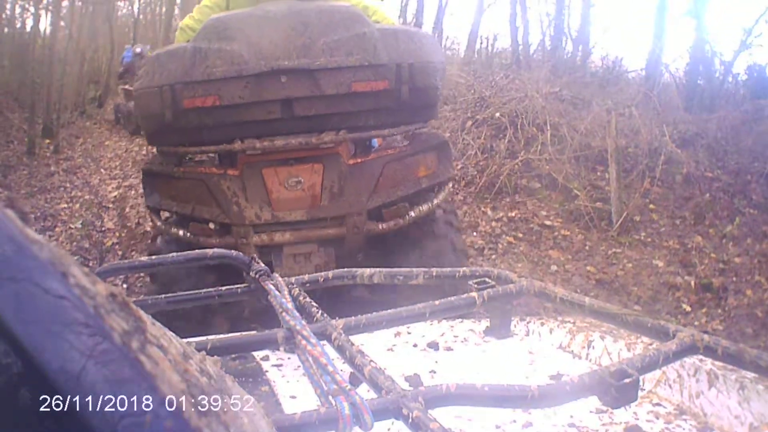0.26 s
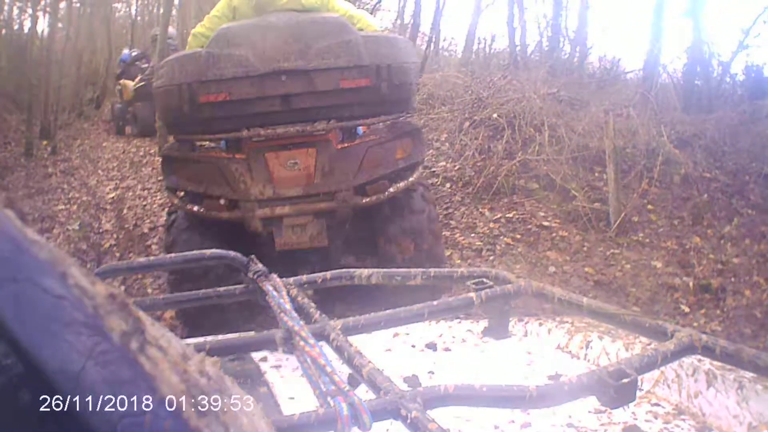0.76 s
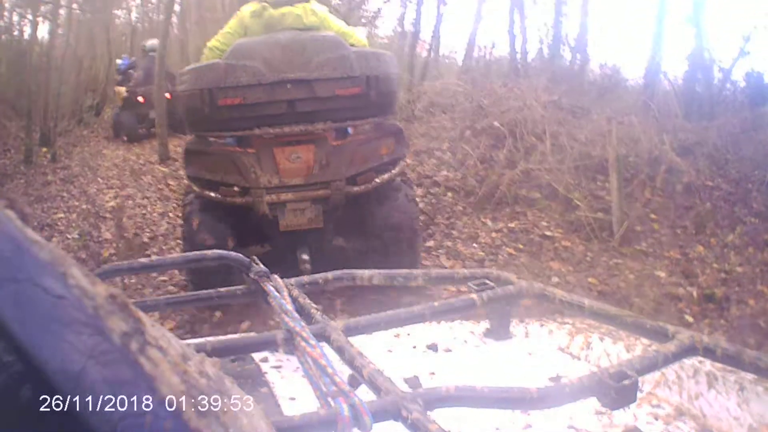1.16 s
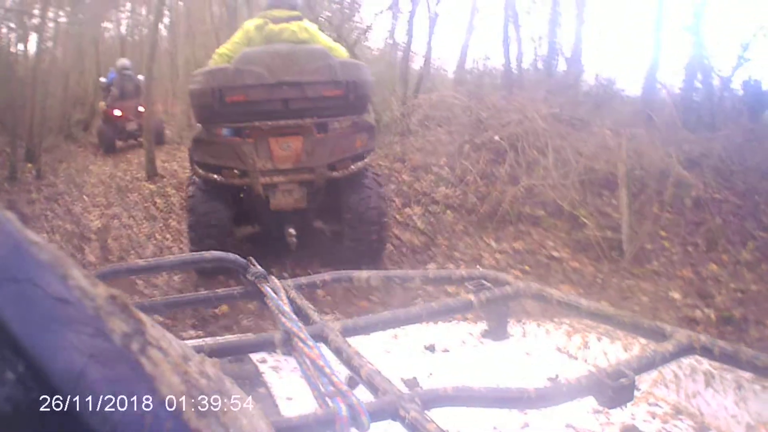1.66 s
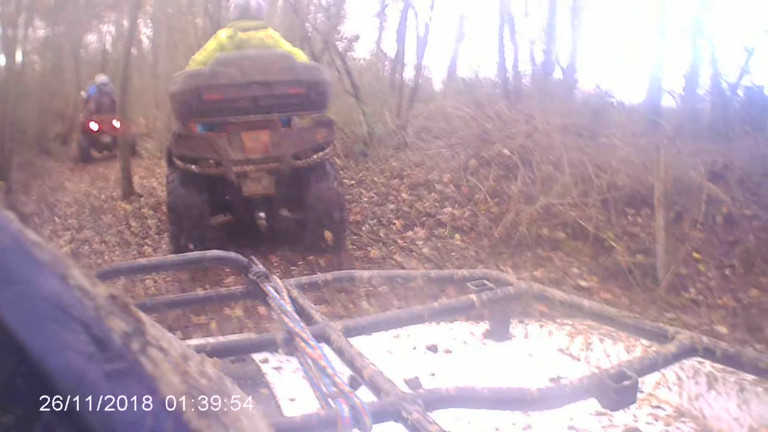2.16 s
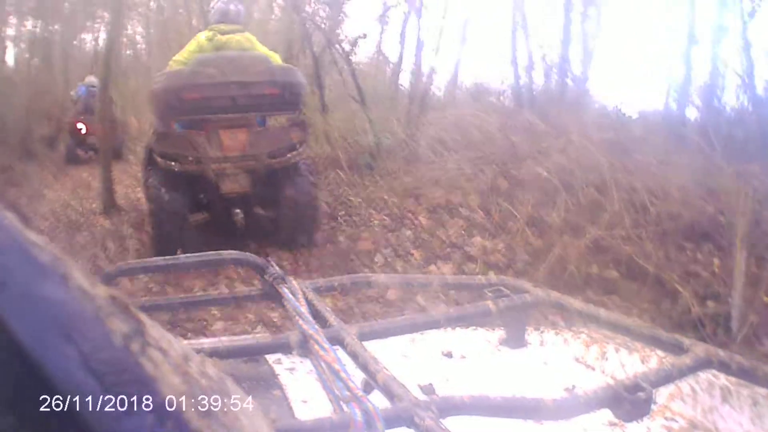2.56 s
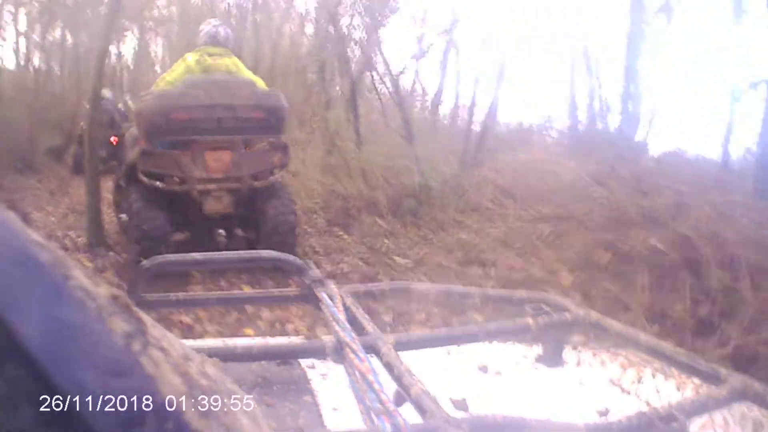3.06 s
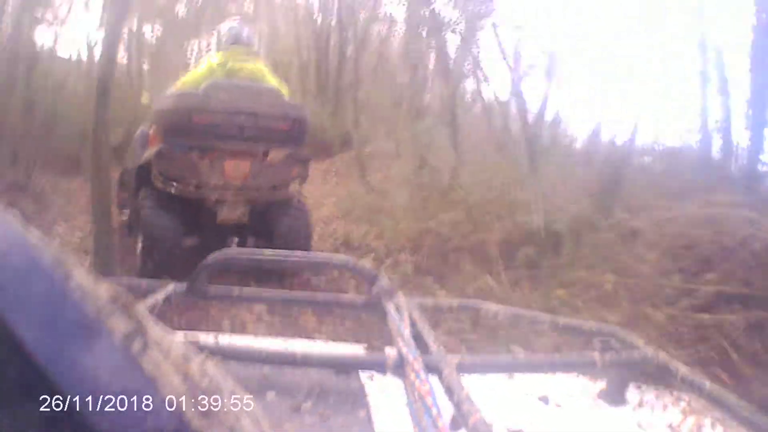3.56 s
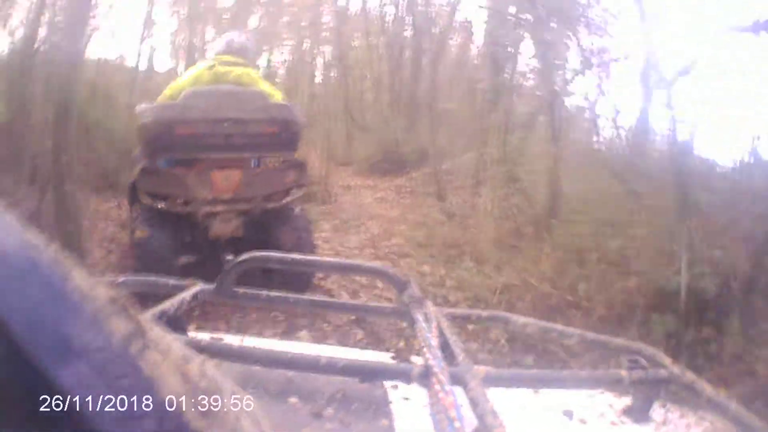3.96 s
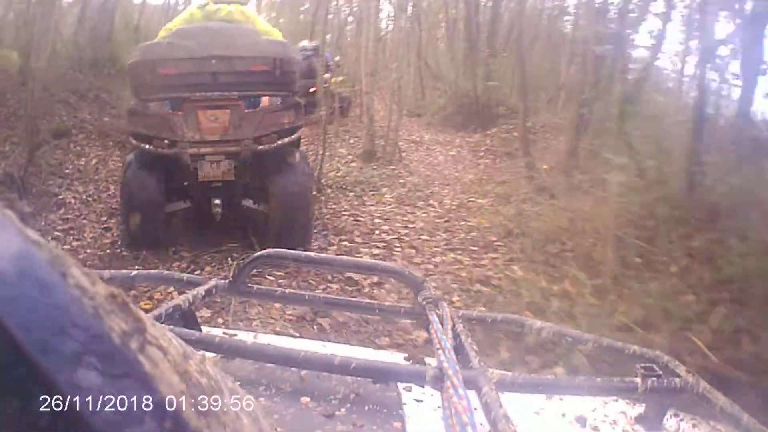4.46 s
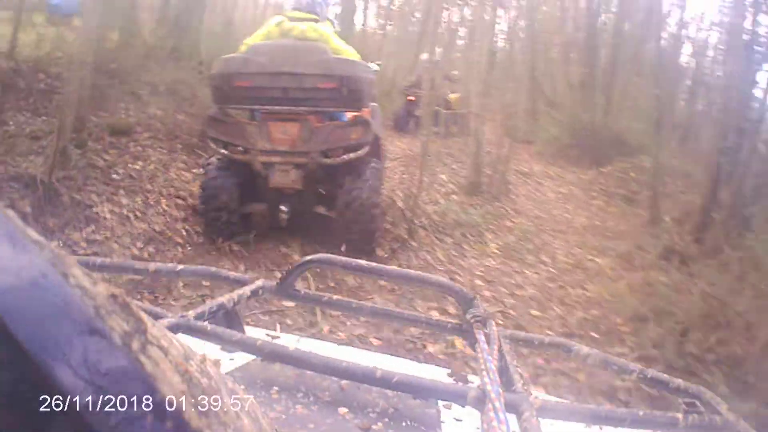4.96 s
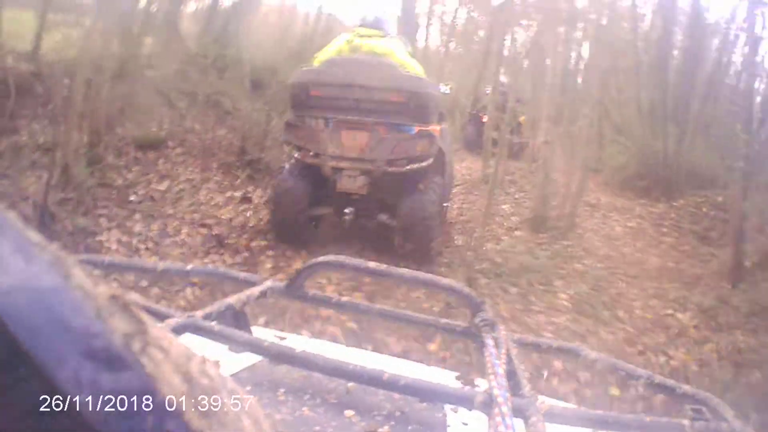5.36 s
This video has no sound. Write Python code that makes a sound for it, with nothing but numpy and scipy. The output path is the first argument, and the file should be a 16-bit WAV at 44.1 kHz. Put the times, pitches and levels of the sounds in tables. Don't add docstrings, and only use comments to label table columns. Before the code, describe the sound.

Low, overloaded engine vibration and rapid hollow plastic rattling come and go, with softer muffled droning and light taps between the bouts.

```python
import sys
import numpy as np
from scipy import signal
from scipy.fft import rfft, irfft, next_fast_len
from scipy.io import wavfile
from scipy.ndimage import uniform_filter1d, map_coordinates

SR = 44100
rng = np.random.default_rng(int(sys.argv[2]) if len(sys.argv) > 2 else 0)


def put_to_file(sound):
    columns = np.atleast_2d(sound).T
    safe = np.clip(columns, -1, 1)
    whole_steps = np.round(safe * 32767)
    wavfile.write(sys.argv[1], SR, whole_steps.astype(np.int16))


def decibels_to_gain(level_db):
    exponent = np.asarray(level_db, float) / 20
    return 10 ** exponent


N = 247401
TIME = np.arange(N) / SR


def unit(x):
    return x / np.sqrt(np.mean(x ** 2) + 1e-20)


def curve(rows):
    seconds, values = np.transpose(rows)
    return np.interp(TIME, seconds, values)


def wobble(rate):
    knots = rng.standard_normal(int(N * rate / SR) + 4)
    return map_coordinates(knots, [TIME * rate])


def filtered(x, response):
    size = next_fast_len(N + 8192)
    return irfft(rfft(x, size) * response(np.fft.rfftfreq(size, 1 / SR)), size)[:N]


def coloured(points):
    hz, db = np.transpose([(10, -120)] + list(points) + [(21000, -120)])
    noise = rng.standard_normal(N)
    return unit(filtered(noise, lambda f: decibels_to_gain(np.interp(np.log(f + 1), np.log(hz), db))))


def resonance(centre_hz, width_hz, skirt=3):
    def peak(f, width):
        return 1j * f * width / (centre_hz ** 2 - f * f + 1j * f * width)
    return lambda f: peak(f, width_hz) * peak(f, skirt * width_hz)


def train(times, sizes):
    places = np.clip(np.round(times * SR).astype(int), 0, N - 1)
    return np.bincount(places, sizes, N)


# pitch in Hz, width in Hz, loudest peak in dB.
PART_TICKS = [(1730, 250, -42.5), (2550, 120, -67.5), (2960, 520, -51.5), (4000, 270, -50.5),
              (5800, 260, -54)]


def ticks(count=110):
    out = 0
    for hz, width_hz, db in PART_TICKS:
        when, softness = rng.random((count, 2)).T
        hits = train(when * N / SR, decibels_to_gain(db + 30.5 - 10 * softness))
        out = out + filtered(hits, resonance(hz, width_hz, 1.5))
    return out


# start in seconds, peak in dB, pitch in Hz.
CLAMP_TAPS = [(1.3872, -39.5, 910), (1.427, -32, 1260), (1.5303, -29, 1260), (1.557, -30.5, 1330),
              (1.712, -28.5, 1140), (1.762, -32, 1730), (1.8036, -28.5, 1210), (1.9418, -25.5, 1770),
              (1.9761, -23, 1710), (3.802, -44.5, 1320), (3.9212, -30.5, 1170), (4.9945, -31, 1630),
              (5.048, -37, 1350), (5.1712, -42, 1320), (5.389, -29, 1060), (5.441, -33, 1170),
              (5.4765, -51, 907), (5.5473, -45, 921)]


def taps(ring_s=0.0027, rise_s=0.00079):
    tones = np.zeros(N + SR)
    t = np.arange(SR // 40) / SR
    shape = np.exp(-t / ring_s) * (1 - np.exp(-t / rise_s))
    for start, db, hz in CLAMP_TAPS:
        tones[round(start * SR):][:len(t)] += decibels_to_gain(db + 2) * shape * np.sin(2 * np.pi * hz * t)
    starts, levels_db, _ = np.transpose(CLAMP_TAPS)
    puffs = signal.fftconvolve(train(starts, decibels_to_gain(levels_db - 3.5)), shape)[:N]
    dull = coloured([(500, -15.5), (1000, 7.5), (2200, -6.5), (3500, -23.5), (6000, -55)])
    return tones[:N] + puffs * dull


# time in seconds, speed in Hz.
SHAKE_SPEED = [(0.0, 41.94), (0.9, 46.11), (1.1, 40.38), (1.4, 40.17), (1.5, 42.06), (2.2, 46.18),
               (2.4, 39.5), (2.8, 39.87), (2.9, 41.03), (3.3, 39.23), (3.4, 43.58), (3.7, 39.15),
               (4.3, 39.01), (4.6, 37.7), (4.7, 40.1), (5.61, 39.52)]


def shake_turns():
    return np.cumsum(curve(SHAKE_SPEED)) / SR


# time in seconds, drone level in dB.
ENGINE_EFFORT = [(0, -35), (.6, -33.5), (1.2, -41), (1.55, -38.5), (1.76, -41), (1.9, -39.5), (2.25, -54),
                 (2.5, -35), (3.3, -37), (3.6, -37), (3.75, -44), (4.3, -42), (4.7, -34), (4.9, -43),
                 (5.1, -50), (5.3, -40), (5.45, -45.5), (5.61, -44.5)]
# pitch in Hz, width in Hz, level in dB.
CASE_AIR = [(270, 33, -4.5), (290, 26, 0), (457.4, 33, 4), (710, 29, -2), (940, 42, -26), (1170, 290, -11),
            (1330, 240, -12), (1650, 410, -17.5)]


def drone():
    firing = 2 * np.pi * shake_turns() / 2
    puffs = decibels_to_gain(1.5 * np.cos(firing) + 2.6 * wobble(45) + 0.42 * wobble(5.8))
    feed = puffs * rng.standard_normal(N)
    out = 0
    for hz, width_hz, db in CASE_AIR:
        drifting = decibels_to_gain(db + 1.5 * wobble(15))
        out = out + drifting * filtered(feed, resonance(hz, width_hz, 3.5))
    out = filtered(out, lambda f: 1 / (1 + (f / 1950) ** 12))
    return decibels_to_gain(curve(ENGINE_EFFORT) - 4) * unit(out)


# pitch in Hz, strength in dB per Hz.
RUMBLE_COLOUR = [(30, -28), (60, 3.5), (115, -7), (150, -11), (250, -16.5), (500, -30.5)]


def rumble():
    shaken = decibels_to_gain(-39.5) + decibels_to_gain(-13) * rattling() + decibels_to_gain(-33 + swing_db())
    return shaken * decibels_to_gain(-2 + 2.4 * wobble(8.8)) * coloured(RUMBLE_COLOUR)


# time in seconds, level in dB rms.
SWING_LEVEL = [(0, -6.5), (.3, -4.5), (.38, -10.5), (.58, -7), (.8, -7), (1.0, -11.5), (1.3, -12.5),
               (1.63, -9), (2.0, -14.5), (2.5, -16), (3.35, -11), (3.66, -9.5), (3.78, -22.5), (4.2, -21.5),
               (4.3, -11.5), (4.68, -9), (5.4, -20), (5.58, -10.5)]
# start, length and rise in seconds, gain in dB.
SURGE_ROWS = [
    (0.963, .24, 0.089, 8),
    (2.493, .78, 0.19, 9.5),
]
# time in seconds, depth in dB, half width in seconds.
JOLTS = [(.7, 11, 0.058), (.95, 7, 0.069), (1.458, 10.5, 0.076), (1.801, 8, 0.044), (2.088, 10.5, .07),
         (2.232, 11, .02), (2.298, 8.5, .018), (2.44, 6.5, 0.036), (3.871, 18, 0.023), (4.43, 13, 0.053),
         (4.56, 5.5, 0.048), (4.922, 3, 0.086), (5.22, 9, 0.045), (5.35, 19, 0.029)]


def swing_db():
    db = curve(SWING_LEVEL)
    fall_s, arch_db = 0.065, 4
    for start, length_s, rise_s, gain_db in SURGE_ROWS:
        corners = [start, start + rise_s, start + length_s, start + length_s + fall_s]
        hold = np.interp(TIME, corners, [0, 1, 1, 0])
        arch = np.sin(np.pi * np.clip((TIME - start) / length_s, 0, 1))
        db = db + gain_db * hold + arch_db * arch
    for middle, depth_db, width_s in JOLTS:
        db = db - depth_db * np.exp(-((TIME - middle) / width_s) ** 2)
    return db


# time in seconds, turns gained (minus is lost).
BEAT_SLIPS = [(0.7, 0.203), (0.95, -0.353), (1.8, 0.253), (2.44, 0.321), (3.87, -0.498), (4.42, -0.24),
              (4.92, -0.41), (5.35, -0.589)]


def mount(slip_s=0.02):
    turns = 0.667 + shake_turns()
    for middle, gained in BEAT_SLIPS:
        turns = turns + gained * (1 + np.tanh((TIME - middle) / slip_s)) / 2
    angle = 2 * np.pi * turns
    lopsided = decibels_to_gain(-28.5 + 2.7 * wobble(16)) * np.cos(2 * angle + 1.4)
    swing = decibels_to_gain(swing_db()) * np.sqrt(2) * (np.cos(angle) + lopsided)
    sway_hz = 24.5 + 2 * wobble(4)
    sway_db = -25 + 1.5 * wobble(4.5) + 2.9 * wobble(12)
    sway = decibels_to_gain(sway_db) * np.sqrt(2) * np.cos(2 * np.pi * np.cumsum(sway_hz) / SR + 1.1)
    return swing + sway


# time in seconds, peak in dB, treble in dB.
SINGLE_KNOCKS = [(1.036, -3.5, -19), (1.591, -8, -19.5), (1.6027, -12, -17), (1.6192, -36, -30),
                 (1.6306, -14, -38), (1.6883, -19.5, -32), (1.6977, -15, -54), (2.4745, -8.5, -12.5),
                 (2.496, -8.5, -27.5), (2.5056, -10, -24.5), (2.5505, -10.5, -24.5), (3.692, -28, -31),
                 (3.705, -26.5, -56), (3.718, -15, -54.5), (4.3654, -20, -21), (4.5, -11, -25.5),
                 (4.549, -25, -26.5), (4.571, -30, -45.5), (4.461, -13, -33), (.284, -13.5, -28),
                 (2.5712, -7, -5), (1.0507, -3, -13.5), (4.3909, -9, -14), (4.6433, -6, -9),
                 (1.212, -31.5, -42), (1.238, -24, -38), (5.6082, -28, -11)]
# first knock and end in seconds, knocks per second at the start and the end.
RATTLE_BOUTS = [(.001, .172, 81.1, 87.7), (.1795, .262, 80, 80), (.2933, .34, 99, 95),
                (.3446, .425, 95, 89), (.4321, .573, 87.3, 91.4), (.5775, .938, 93.6, 92.7),
                (.9425, 1.03, 91, 82), (1.0515, 1.192, 82.3, 79.8), (1.2501, 1.295, 78.4, 87),
                (2.1145, 2.355, 94, 98.8), (2.3633, 2.43, 99, 100.3), (2.5709, 2.965, 78.5, 81.8),
                (2.9701, 3.21, 81.9, 79), (3.2186, 3.28, 78.9, 78.2), (3.3054, 3.4, 99.6, 75.4),
                (4.3894, 4.455, 96.6, 106.3), (4.5821, 4.665, 109.4, 81), (4.6792, 4.86, 81.5, 76.7)]
# level in dB at the start and the end, hardness in dB,
# looseness from 0 to 1, side struck first (plus is hard, minus is soft).
BOUT_BLOWS = [(-20, -18, 0, 0.66, -1.6), (-18.5, -16.5, 3, 0.78, .7), (-23, -24.5, -5, 0.47, .3),
              (-19.5, -28, -9.5, 0.43, 4.8), (-18.5, -16.5, 3.5, 0.55, -1.9), (-17.5, -14, 7.5, 0.73, 0.64),
              (-11.5, -15, 7, 0.3, 1), (-16.5, -28, -0.5, 0.89, -1.4), (-19, -15.5, -1.5, 0.23, -1.1),
              (-19, -15, 2.5, 0.32, -1.3), (-22.5, -17, 0, 0.32, -1.5), (-23.5, -15, 0.5, 0.73, 0.58),
              (-15.5, -25, -8.5, .72, -1.3), (-22.5, -18.5, -3, 0.97, -0.076), (-16, -22, -4.5, 0.24, .3),
              (-27.5, -18.5, -1.5, 0.59, .5), (-36, -19, -7, 0.54, 0.95), (-21, -25.5, -5.5, .42, -2.7)]


def rattling():
    gain = 0
    for bout, blows in zip(RATTLE_BOUTS, BOUT_BLOWS):
        gain = gain + decibels_to_gain(np.interp(TIME, bout[:2], blows[:2], -120, -120))
    return uniform_filter1d(gain, size=SR // 12)


def contacts():
    rows = [(s, db - 7, treble_db + 11.5, 0.45) for s, db, treble_db in SINGLE_KNOCKS]
    last_end = 0
    for bout, blows in zip(RATTLE_BOUTS, BOUT_BLOWS):
        start, end, *pace = bout
        from_db, to_db, hard_db, loose, first_side = blows
        t = np.arange(start, end, 1 / SR)
        count = np.floor(np.cumsum(np.interp(t, [start, end], pace)) / SR)
        t = t[np.diff(count, prepend=-1) > 0]
        luck = rng.standard_normal((len(t), 4))
        side = first_side * (-1.0) ** np.arange(len(t))
        db = np.interp(t, [start, end], [from_db, to_db])
        db = db - 5 * (t == start) * (start - last_end > 0.02)
        last_end = end
        faint = np.clip(-21 - db, 0, None)
        glances = (t > start) * (rng.random(len(t)) < 0.16) * (np.mean(pace) < 84)
        glance_db = -9.5 * glances
        late_s = 0.001 + 0.0004 * luck[:, 0]
        level = db + 5 + 1.15 * side + 0.4 * faint * np.sign(side) + 1.63 * luck[:, 1] + glance_db
        hardness = hard_db + glance_db - 0.45 * faint + 3.14 * side + 3 * luck[:, 2]
        looseness = loose - 0.2 * side + 0.059 * luck[:, 3]
        rows += zip(t + late_s, level, hardness, looseness)
    return np.transpose(rows)


# pitch in Hz, width in Hz, level in dB.
CASE_MODES = [(440, 240, -6.5), (643, 119, -2.5), (796, 140, -5), (1218, 200, 4.5), (1630, 288, 5),
              (2125, 450, 4.5), (2568, 210, -1.5), (2980, 343, 0), (4320, 470, -8.5), (5280, 620, -14.5),
              (6700, 2500, -22.5), (7590, 200, -27.5), (8440, 1700, -36.5), (11500, 3300, -33),
              (13700, 430, -33)]
# pitch in Hz, strength in dB per Hz.
CRACK_COLOUR = [(150, -43), (250, -19.5), (597, 7), (2160, 1.5), (3280, -8), (6940, -39), (13400, -58),
                (16000, -41.5)]


def rattle(swing, bounces=9, bounce_s=0.0012, crack_s=0.0025):
    s, db, hard_db, loose = contacts()
    order = np.arange(bounces)
    later = order > 0
    gaps = bounce_s * rng.uniform(0.3, 1.7, (len(s), bounces)) * later
    times = (s[:, None] + np.cumsum(gaps, 1)).ravel()
    tight = np.clip(1.1 - loose, 0.1, 1)[:, None]
    level = db[:, None] - 7 * tight * order + (3 * rng.standard_normal(gaps.shape) - 6.5) * later
    hard = hard_db[:, None] - 6 * tight * order
    push = -np.sign(np.interp(s, TIME, swing))[:, None]
    ring = 0
    for hz, width_hz, mode_db in CASE_MODES:
        share = np.clip(np.log2(hz / 1600) / 2, 0, 1.3)
        scatter, coin = rng.standard_normal((2,) + gaps.shape)
        direction = np.where(later, np.sign(coin), push)
        sizes = decibels_to_gain(level + mode_db + share * hard + 28 + 2 * scatter) * direction
        ring = ring + filtered(train(times, sizes.ravel()), resonance(hz, width_hz))
    fade = np.exp(-np.arange(SR // 40) / SR / crack_s)
    crack_hits = train(times, decibels_to_gain(level + 0.16 * hard - 6).ravel())
    crack = signal.fftconvolve(crack_hits, fade)[:N] * coloured(CRACK_COLOUR)
    thump = filtered(train(s, decibels_to_gain(db + 24.5 - 5)), resonance(84, 90))
    return ring + crack + thump


def scene():
    swing = mount()
    return (ticks() + taps() + drone() + rumble() + swing + rattle(swing))[None]


def top_cut(x):
    return signal.sosfilt(signal.butter(12, 16540, fs=SR, output="sos"), x)


# pitch in Hz, strength in dB per Hz.
HISS_COLOUR = [(1000, -12.5), (2600, -0.5), (4200, 1), (5000, -6.5), (6000, -6), (9000, -14.5),
               (16000, -22.5)]


def record(dry, top=0.707, dull_hz=13000):
    clipped = np.clip(dry[0] - 0.012, -top, top)
    x = filtered(clipped, lambda f: 1 / (1 + (f / dull_hz) ** 2))
    hiss = decibels_to_gain(-70) * coloured(HISS_COLOUR) * (np.abs(x) < 0.69)
    x = filtered(x + hiss, lambda f: f < 16200)
    return top_cut(x[None])


dry = scene()
out = record(dry)
put_to_file(out)
```